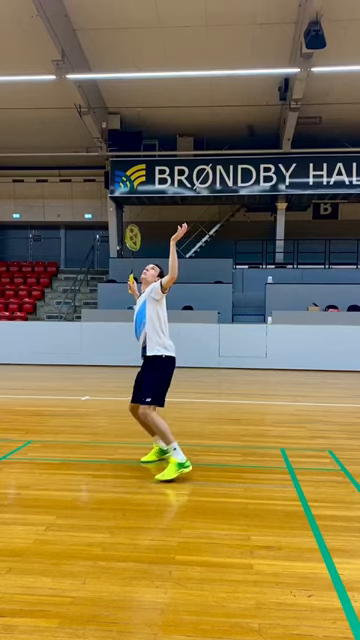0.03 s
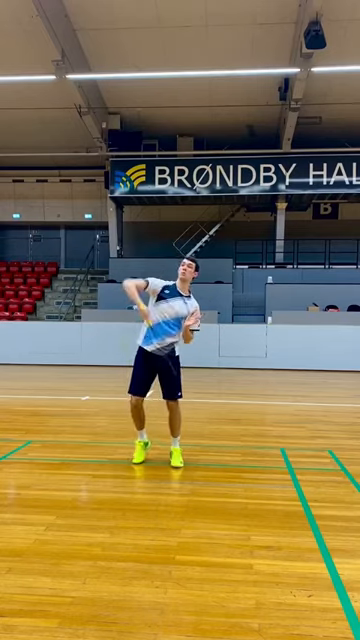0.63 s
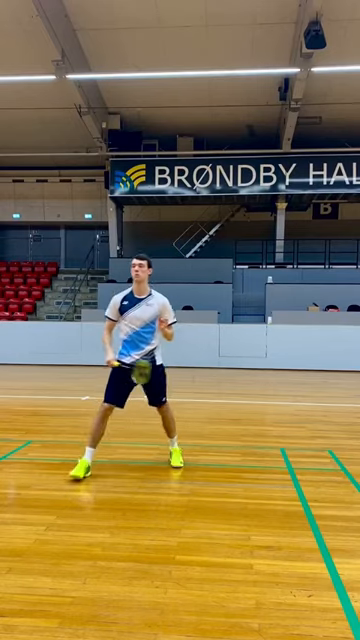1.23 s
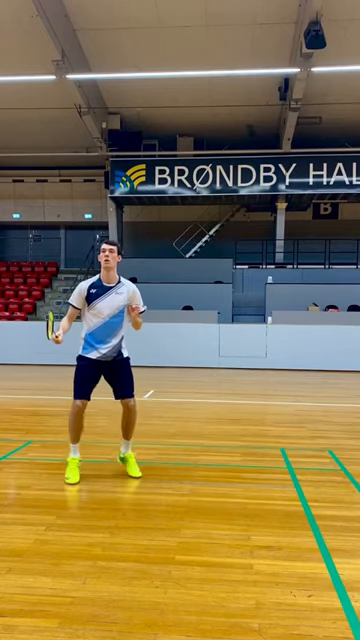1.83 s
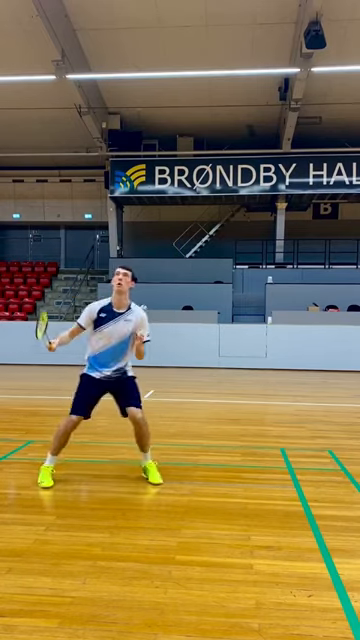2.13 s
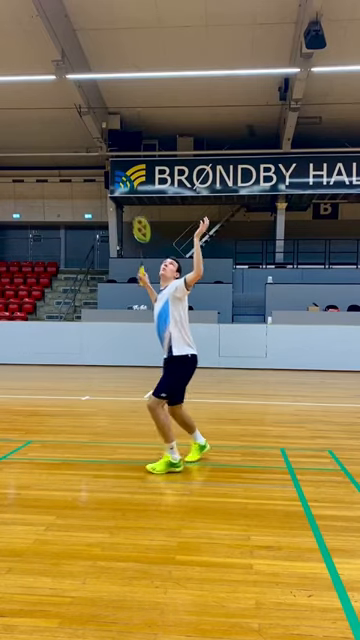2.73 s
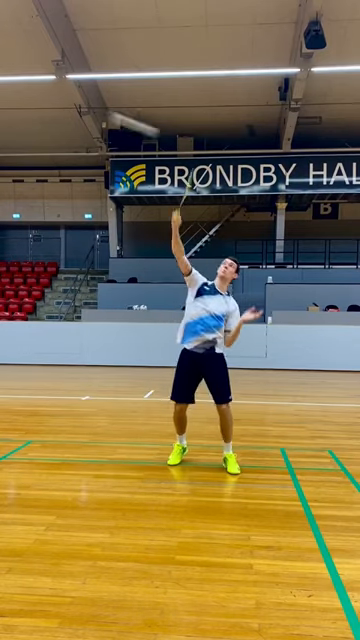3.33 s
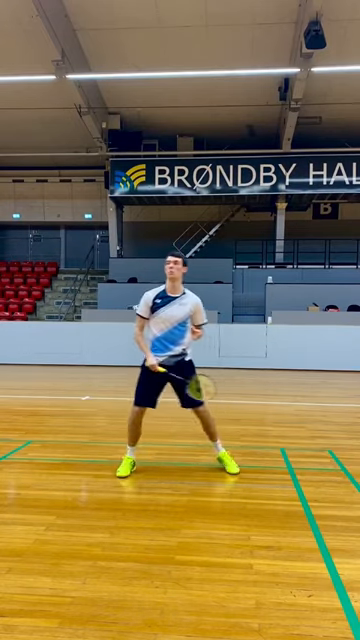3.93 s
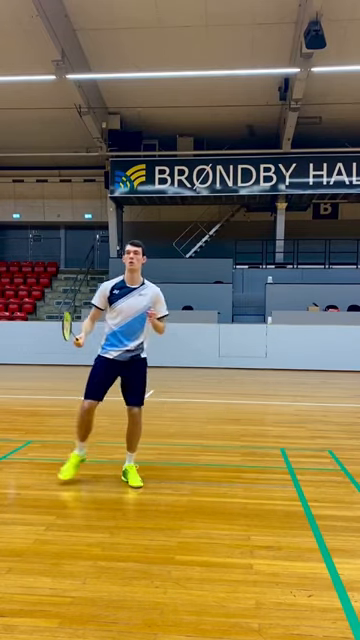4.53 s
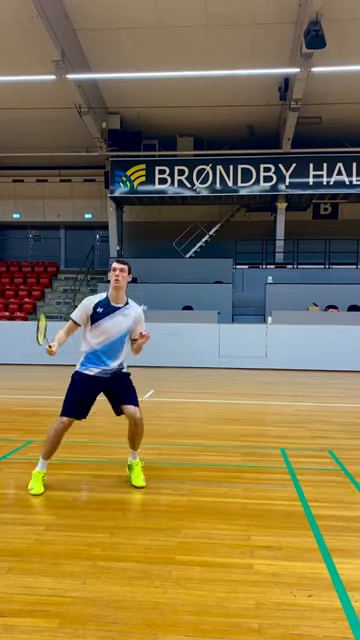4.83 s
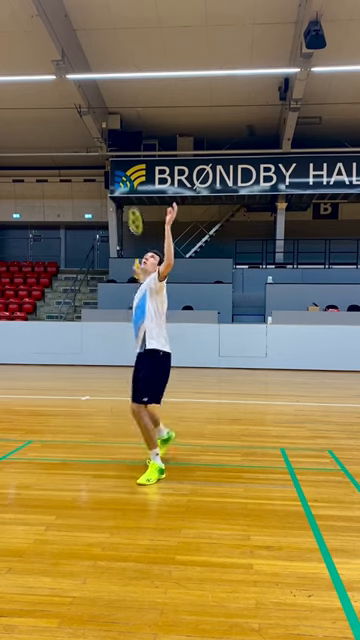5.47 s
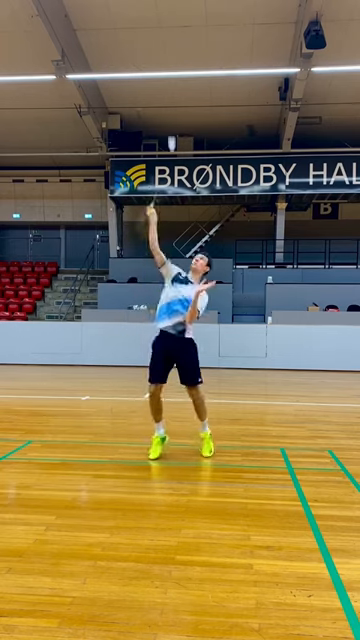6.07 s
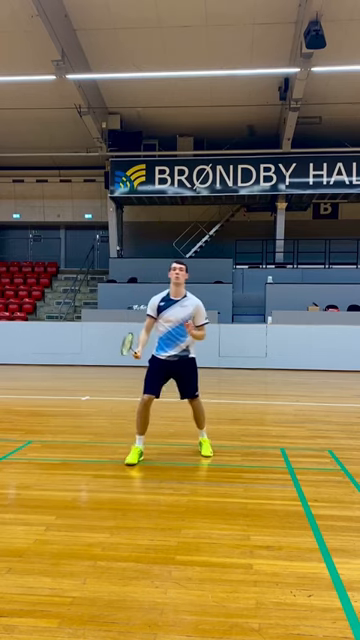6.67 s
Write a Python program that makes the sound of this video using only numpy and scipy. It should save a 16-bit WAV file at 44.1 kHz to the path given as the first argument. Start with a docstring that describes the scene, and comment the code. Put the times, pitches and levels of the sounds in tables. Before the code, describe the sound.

Sharp badminton racket hits echo through a large sports hall, with thumping footsteps, brief shoe squeaks and a low ventilation rumble.

```python
"""A badminton rally in a large sports hall. Ventilation rumbles and feet thump on the sprung wooden floor. At
0.5 s comes a close overhead clear: a rustle, a swish, a pop of cork on strings and a short ring, then over two
seconds of reverberation. Dull knocks, squeaks and scuffs fall between the strokes. The feeder's return, from
behind the microphone, catches the frame at 1.9 s; a second clear follows at 3.3 s, its return at 4.7 s. The
last clear, at 6.1 s, is the hardest and drives the limiter."""
import sys
import numpy as np
from scipy import signal
from scipy.fft import rfft, irfft, next_fast_len
from scipy.io import wavfile
from scipy.ndimage import uniform_filter1d, minimum_filter1d

SR = 44100
rng = np.random.default_rng(int(sys.argv[2]) if len(sys.argv) > 2 else 0)


def store_pcm(level_fs):
    """Save levels as 16-bit WAV."""
    pcm = np.round(np.clip(level_fs, -1, 1) * 32767).astype(np.int16)
    wavfile.write(sys.argv[1], SR, np.atleast_2d(pcm).T)


N = 295470
LEAD = SR   # one second before t = 0 in which the hall is already sounding


def from_db(db):
    """Amplitude ratio of a level."""
    return 10 ** (np.asarray(db) / 20)


def rms_one(x):
    """Normalisation to unit rms."""
    return x / np.sqrt(np.mean(x ** 2) + 1e-20)


def seconds(length):
    """Time axis of a short sound."""
    return np.arange(int(length * SR)) / SR


def add(track, s, sound):
    """Superposition: a sound joins the track at time s."""
    at = LEAD + int(round(s * SR))
    part = sound[:max(len(track) - at, 0)]
    track[at:at + len(part)] += part


def butter(x, hz, kind, order=2):
    """Causal Butterworth filter."""
    return signal.sosfilt(signal.butter(order, np.clip(hz, 10, .45 * SR), kind, fs=SR, output="sos"), x)


def log_hz(size):
    """Log frequency of each spectral bin."""
    return np.log(np.fft.rfftfreq(size, 1 / SR) + 1)


def noise(spectrum, size):
    """Noise of a given spectral shape, rms 1."""
    hz, db = np.transpose(spectrum)
    gain = from_db(np.interp(log_hz(size), np.log(hz), db))
    return rms_one(irfft(rfft(rng.standard_normal(size)) * gain, size))


def band_noise(t, edges_hz, order=2):
    """A burst of band-limited noise, rms 1."""
    return rms_one(butter(rng.standard_normal(len(t)), edges_hz, "band", order))


def steady_noise(t, hz, kind, order=2):
    """A stretch of stationary filtered noise, long-term rms 1."""
    return rms_one(butter(rng.standard_normal(SR), hz, kind, order))[-len(t):]


def decay(t, t60):
    """Exponential damping by 60 dB in t60 seconds."""
    return from_db(-60 * t / t60)


def arch(t):
    """Half-sine envelope over the whole of t."""
    return np.sin(np.pi * np.arange(len(t)) / len(t))


def pop(t, low_hz, top_hz):
    """A soft contact acts as a band-limited impulse."""
    impulse = 1. * (t == 0) + 1e-18
    return butter(butter(impulse, top_hz, "low"), low_hz, "high")


def at_force(force_db, base, slope):
    """Linear law of a stroke: base value at 0 dB, plus slope per dB of force."""
    return base + slope * force_db


def pair(mid, side, correlation):
    """Partial coherence: left and right mixed from two independent signals."""
    c = np.clip(correlation, -1, 1)
    return (np.sqrt(1 + c) * mid + np.sqrt(1 - c) * side * [[1], [-1]]) / np.sqrt(2)


# sole squeaks: t/s, duration/s, start f/Hz, end f/Hz, level/dB, overtone level/dB, echo level/dB
SOLE_SQUEAKS = [(-0.55, .03, 3047, 3116, -30, -11, -6.5), (1.693, .013, 2710, 2810, -29.5, -8.5, -2),
                (1.942, 0.044, 2050, 2106, -40, -20, -6.5), (2.466, 0.028, 2910, 2999, -26.5, -4, 3),
                (2.714, .008, 2720, 2480, -42.5, 7.5, -9), (2.766, .018, 2790, 2585, -41.5, -13.5, -3),
                (5.15, 0.012, 2780, 2955, -29, -16, -20), (5.215, .019, 2680, 3140, -23.5, -1.5, -4)]


def squeaks(third_db=-17, friction_db=-23, echo_s=.063, echo_top_hz=4300):
    """Stick-slip oscillation: rubber grips unevenly, and a wall reflects each chirp duller."""
    out = np.zeros(LEAD + N)
    for s, length, start_hz, end_hz, db, overtone_db, echo_db in SOLE_SQUEAKS:
        t = seconds(length)
        waver = .026 * steady_noise(t, [70, 200], "band")
        phase = 2 * np.pi * np.cumsum(np.linspace(start_hz, end_hz, len(t)) * (1 + waver)) / SR
        overtones = np.sin(2 * phase) + from_db(third_db) * np.sin(3 * phase)
        grip = 1 + .3 * steady_noise(t, 200, "low", order=4)
        friction = from_db(friction_db) * steady_noise(t, [2600, 5500], "band")
        tone = np.sin(phase) + from_db(overtone_db) * (overtones + friction)
        chirp = from_db(db) * arch(t) * grip * tone
        add(out, s, chirp)
        add(out, s + echo_s, from_db(echo_db) * butter(chirp, echo_top_hz, "low", order=3))
    return out


# reverberation by band: f/Hz, level/dB, t60/s, left-right correlation
HALL_BANDS = [(60, -15.5, 1.1, 1), (130, -19.5, 0.63, 0.97), (264, -4.5, 1, 0.96), (550, -2.5, 3.2, 0.24),
              (1100, -1.5, 2.54, 0.068), (2200, -4, 2.84, 0.75), (3200, 2.5, 1.72, 0.17),
              (5080, -7.5, 1.28, 0.66), (9200, -1.5, 0.53, 0), (16000, -25.5, 0.86, 0.13)]


def hall(x, first_s=.0021, early_s=.027, early_db=-7, blend_s=.021, lumpiness=.4, lumpy_s=.36):
    """Reverberation: separate reflections merge into a diffuse tail; air absorption shortens the treble."""
    t = seconds(3)
    spread = lumpiness * np.exp(-t / lumpy_s)
    white = rng.standard_normal((2, len(t)))
    reflections = rfft(white * np.exp(spread * rng.standard_normal(len(t)) - spread ** 2))
    centres = np.log([hz for hz, *_ in HALL_BANDS])
    response = 0
    for share, (hz, db, t60, correlation) in zip(np.eye(len(HALL_BANDS)), HALL_BANDS):
        mid, side = irfft(reflections * np.interp(log_hz(len(t)), centres, share), len(t))
        unit_energy_decay = decay(t, t60) * np.sqrt(np.log(1e6) / (t60 * SR))
        response += from_db(db) * pair(mid, side, correlation) * unit_energy_decay
    early, late_s = from_db(early_db), first_s + early_s
    build_up = np.interp(t, [0, first_s, late_s, late_s + blend_s], [0, early, early, 1])
    return signal.fftconvolve(x[None], response * build_up, axes=1)[:, :len(x)]


# ventilation spectrum: f/Hz, spectral level/dB
VENTILATION_SPECTRUM = [(20, -24.5), (50, 2), (110, -4.5), (200, -12), (500, -18.5), (1000, -22),
                        (2000, -32.5), (4000, -44), (9000, -58.5), (16000, -75.5)]


def ventilation(db=-51):
    """Stationary low-frequency noise, almost coherent between left and right."""
    mid, side = noise(VENTILATION_SPECTRUM, N), noise(VENTILATION_SPECTRUM, N)
    return from_db(db) * pair(mid, side, correlation=.99)


# low thumps of footfalls and of the two returns: t/s, level/dB, main mode f/Hz
LOW_THUMPS = [(0.423, -23, 106), (0.628, -30.5, 87), (1.206, -25, 112.6), (1.305, -24, 105),
              (1.897, -26, 125), (2.043, -23, 109), (2.516, -29, 85), (2.685, -31.5, 97),
              (3.223, -29.5, 127), (3.806, -29, 141), (4.036, -29.5, 126.4), (4.285, -26.5, 103),
              (4.70, -28, 133), (4.91, -29, 77.3), (5.25, -28, 88), (5.459, -30, 100), (6.071, -17, 105),
              (6.594, -25, 104)]


def thumps(rise_s=.01, t60=.14, low_mode_db=-10, rumble_db=-9, pat_db=-21):
    """Impact excitation: footfalls and the two returns boom in two modes, with a rumble and a soft pat."""
    out, t = np.zeros(LEAD + N), seconds(.3)
    softer_repeats = [(s + .088, db - 8, hz) for s, db, hz in LOW_THUMPS]
    light_steps = [(.25 * (k + .5 * late), -41 + 3 * loud, 97 * (1 + .17 * high))
                   for k, (late, loud, high) in enumerate(rng.uniform(-1, 1, size=(40, 3)))]
    for s, db, hz in LOW_THUMPS + softer_repeats + light_steps:
        boom = np.sin(2 * np.pi * hz * t) + from_db(low_mode_db) * np.sin(2 * np.pi * .62 * hz * t)
        rumble = from_db(rumble_db) * band_noise(t, [95, 192.6])
        pat = from_db(pat_db) * band_noise(t, [200, 1300])
        envelope = np.minimum(t / rise_s, 1) * decay(t, t60)
        add(out, s, from_db(db) * (boom + rumble + pat) * envelope)
    return out


# spectrum of rubs and ticks: f/Hz, spectral level/dB
CONTACT_SPECTRUM = [(200, -2.5), (1000, 7.5), (3000, 4.5), (5500, -1), (10000, -4.5), (16000, -7)]


def rub(length, grain_db=3):
    """Sliding friction: a swell of noise, made grainy by random amplitude modulation."""
    t = seconds(length)
    grain = from_db(grain_db * steady_noise(t, 150, "low"))
    return arch(t) ** 2 * grain * noise(CONTACT_SPECTRUM, SR)[:len(t)]


def shirt(near_loss_db=3, ahead_s=.056, recovery_s=.6, recovery_db=-60.5):
    """Cloth friction: the near player's shirt rustles in each swing and in the recovery after it."""
    out = np.zeros(LEAD + N)
    for s, force_db, _, loss_db, *_ in RACKET_STROKES:
        if loss_db < near_loss_db:
            add(out, s - ahead_s, from_db(at_force(force_db, -50, .31)) * rub(length=.12))
            add(out, s + recovery_s, from_db(recovery_db) * rub(length=.38))
    return out


# dull knocks, and a brief contact just before the return at 4.7 s:
# t/s, level/dB, ring f/Hz, left minus right level/dB
DULL_KNOCKS = [(0.4195, -39, 2010, -5), (1.3021, -28, 1285, 3), (1.9873, -24.5, 1100, -2),
               (4.2527, -19.5, 1306, 9.5), (4.338, -33, 1340, 1), (4.692, -24.5, 1447, 11)]


def knocks(pop_db=15, thump_db=6, thump_hz=250, ring_db=-3, rattle_db=-12):
    """Damped impacts with a rattle and a short ring. Returns (stereo direct, ringless feed to the hall)."""
    out, to_hall, t = np.zeros((2, LEAD + N)), np.zeros(LEAD + N), seconds(.12)
    for s, db, hz, pan_db in DULL_KNOCKS:
        mode = from_db(ring_db) * np.sin(2 * np.pi * hz * t) * decay(t, t60=.024)
        ring = butter(mode, 1.4 * hz, "low", order=4)
        rattle = from_db(rattle_db) * band_noise(t, [150, 1.05 * hz], order=4) * decay(t, t60=.071)
        contact = from_db(pop_db) * butter(pop(t, low_hz=169, top_hz=hz), .95 * hz, "low", order=4)
        thump = from_db(thump_db) * butter(contact, thump_hz, "low", order=1)
        body = contact + thump + rattle
        add(to_hall, s, from_db(db) * body)
        for track, side in zip(out, (.5, -.5)):
            add(track, s, from_db(db + side * pan_db) * (body + ring))
    return out, to_hall


TREBLE_LOSS = 2.26   # dB lost by whistle, crack and string ring per dB of distance loss


def swings(swing_s=.048, start_ratio=.48, width_hz=170):
    """Vortex shedding: the shaft whistles higher and louder as the racket speeds up."""
    out, t = np.zeros(LEAD + N), seconds(swing_s)
    envelope = np.sqrt(arch(t) * 2 * t / swing_s)
    for s, force_db, _, loss_db, *_ in RACKET_STROKES:
        end_hz = at_force(force_db, 617.5, 33.1)
        db = at_force(force_db, -48, .35) - TREBLE_LOSS * loss_db
        phase = 2 * np.pi * np.cumsum(np.geomspace(start_ratio * end_hz, end_hz, len(t))) / SR
        eddies = rms_one(steady_noise(t, width_hz, "low") * np.sin(phase))
        add(out, s - swing_s, from_db(db) * eddies * envelope)
    return out


# strokes: t/s, force level/dB, string f/Hz, distance loss/dB, floor delay/s, wall delay/s
RACKET_STROKES = [(0.4753, 16, 1395, 0, 0.0034, 0.08), (1.8965, 6, 1355, 6.5, .0024, 0.056),
                  (3.3342, 4.5, 1393, 0.5, 0.0032, 0.075), (4.6980, 10, 1403, 8, .0022, .052),
                  (6.091, 27, 1453, -0.5, .0033, 0.072)]
# string bed modes, mains and crosses beating in a close pair: ratio to string f, level/dB, t60/s
STRING_MODES = [(0.999, -11.5, .038), (.96, -16, .11), (1.53, -8.5, .04), (2.08, -28.5, .035),
                (2.701, -15, .03), (3.15, -20, .03), (3.58, -26, .04)]
# crack of the feathers: f/Hz, spectral level/dB
CRACK_SPECTRUM = [(200, -18.5), (1000, -8), (2400, 5.5), (3200, -4), (5200, 10.5), (7000, -4), (10500, 0),
                  (16000, -5)]


def strokes(floor_db=-2.5, thump_hz=400, echo_top_hz=5500):
    """Impulse response of strings hit by cork, with floor and wall echoes. Returns (direct, hall feed)."""
    direct, to_hall, t = np.zeros(LEAD + N), np.zeros(LEAD + N), seconds(.2)
    for s, force_db, string_hz, loss_db, floor_s, wall_s in RACKET_STROKES:
        low_hz, top_hz = at_force(force_db, 184, -.12), at_force(force_db, 2680, -28.5)
        cork = from_db(force_db - loss_db) * butter(pop(t, low_hz, top_hz), .76 * low_hz, "high")
        thump = from_db(at_force(force_db, 11, -.21)) * butter(cork, thump_hz, "low", order=1)
        ring_db = at_force(force_db, -22, .8654) - TREBLE_LOSS * loss_db
        modes = [from_db(ring_db + db) * np.cos(2 * np.pi * string_hz * ratio * t) * decay(t, t60)
                 for ratio, db, t60 in STRING_MODES]
        crack_db = at_force(force_db, -16, .37) - TREBLE_LOSS * loss_db
        crack_noise = from_db(crack_db) * noise(CRACK_SPECTRUM, len(t))
        hit = cork + thump + sum(modes) + crack_noise * decay(t, t60=.03)
        # distance weakens the direct pop, while its wall echo and reverberation keep their strength
        echo_db = at_force(force_db, -14.5, -.307) + loss_db
        hall_db = at_force(force_db, .38, -.0646) + loss_db
        add(direct, s, hit)
        add(direct, s + floor_s, from_db(floor_db) * hit)
        add(direct, s + wall_s, from_db(echo_db) * butter(hit, echo_top_hz, "low"))
        # a longer burst of the crack's noise feeds the hall, giving a smooth, bright reverberation
        long_burst = from_db(-8) * crack_noise * decay(t, t60=.12)
        main_mode = from_db(-7) * modes[0]   # the only string mode that carries far
        add(to_hall, s, from_db(hall_db) * (cork + from_db(-5) * thump + main_mode + long_burst))
    return direct, to_hall


# ticks of soles and racket frame: t/s, level/dB, low cut f/Hz
CONTACT_TICKS = [(1.292, -48, 2000), (1.5452, -22, 11900), (1.613, -40, 2000), (2.205, -44.5, 2000),
                 (2.925, -44.5, 2024), (3.311, -29.5, 500), (3.969, -54, 2000), (5.5434, -47.5, 2000)]


def ticks(t60=.038):
    """Brief contacts radiate bright, quickly damped bursts of noise."""
    out, t = np.zeros(LEAD + N), seconds(.032)
    for s, db, low_hz in CONTACT_TICKS:
        burst = butter(noise(CONTACT_SPECTRUM, len(t)), low_hz, "high", order=1)
        add(out, s, from_db(db) * burst * decay(t, t60))
    return out


# racket frame modes: f/Hz, level/dB, t60/s
FRAME_MODES = [(3540, -4.5, .11), (4150, -2.5, 0.088), (4720, 4.5, 0.07), (5270, -8, 0.095)]


def frame(hit_s=1.897, hit_db=-32.5):
    """Free vibration: an off-centre stroke sets the racket frame ringing briefly."""
    out, t = np.zeros(LEAD + N), seconds(.2)
    for hz, db, t60 in FRAME_MODES:
        add(out, hit_s, from_db(hit_db + db) * np.sin(2 * np.pi * hz * t) * decay(t, t60))
    return out


# sliding soles: t/s, duration/s, level/dB
SOLE_SCUFFS = [(2.397, 0.1, -51.5), (2.764, 0.03, -57.5), (2.882, 0.043, -53.5), (3.062, .058, -61),
               (4.191, 0.093, -53), (4.93, .02, -54)]


def scuffs():
    """Friction noise of soles sliding on the boards."""
    out = np.zeros(LEAD + N)
    for s, length, db in SOLE_SCUFFS:
        add(out, s, from_db(db) * rub(length))
    return out


def scene():
    """Superposition of the direct field, the reverberant field and the ventilation."""
    squeak, thump = squeaks(), thumps()
    knock, knocks_to_hall = knocks()
    swish = swings()
    hits, hits_to_hall = strokes()
    rubs_and_ticks = shirt() + ticks() + scuffs()
    direct = squeak + thump + swish + hits + frame() + rubs_and_ticks
    to_hall = (from_db(-4) * squeak + from_db(10.5) * thump + from_db(5) * knocks_to_hall
               + from_db(-3.5) * swish + hits_to_hall + from_db(-1.5) * rubs_and_ticks)
    # the left microphone port is slightly weaker, the right one a sample later
    ports = np.array([from_db(-.8) * direct, np.roll(direct, 1)]) + knock
    rally = (ports + hall(to_hall))[:, LEAD:]
    return butter(rally + ventilation(), 36, "high")


# dips in the microphone's response: f/Hz, width/Hz, level/dB
RESPONSE_DIPS = [(7405, 700, -19.5), (13300, 790, -19.5)]


def microphone(x, allpass_hz=1200, stages=11):
    """Minimum-phase dips colour the treble; allpass dispersion delays the lows by about 3 ms."""
    size = next_fast_len(N + SR)
    hz = np.fft.rfftfreq(size, 1 / SR)
    dips_db = sum(db * np.exp(-np.abs((hz - centre) / width) ** np.pi)
                  for centre, width, db in RESPONSE_DIPS)
    cepstrum = irfft(np.log(from_db(dips_db)), size)
    minimum_phase = np.exp(rfft(cepstrum * (1 + np.sign(np.fft.fftfreq(size)))))
    dispersion = np.exp(-2j * stages * np.arctan(hz / allpass_hz))
    return irfft(rfft(x, size) * minimum_phase * dispersion, size)[:, :N]


def limiter(x, ceiling_db=-2, release_db_per_s=27):
    """Peak limiting: the gain drops at once for a peak above the ceiling and creeps back."""
    over_db = np.maximum(20 * np.log10(np.abs(x).max(axis=0) + 1e-9) - ceiling_db, 0)
    release_db = release_db_per_s * np.arange(N) / SR
    cut_db = np.maximum.accumulate(over_db + release_db) - release_db
    return x * from_db(uniform_filter1d(minimum_filter1d(-cut_db, size=65), size=65))


def record(dry):
    """Signal chain: microphone, limiter, a quick fade-in from silence and a steep low-pass."""
    silent_s, fade_s, stopband_hz = .028, .008, 16900
    fade_in = np.clip((np.arange(N) / SR - silent_s) / fade_s, 0, 1)
    low_pass = signal.cheby2(14, 60, stopband_hz, fs=SR, output="sos")
    return signal.sosfilt(low_pass, limiter(microphone(dry)) * fade_in)


dry = scene()
out = record(dry)
store_pcm(out)
```